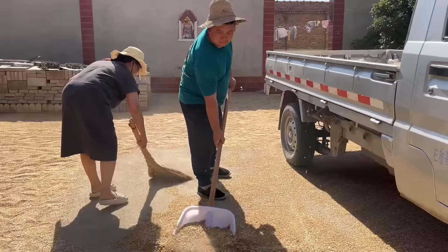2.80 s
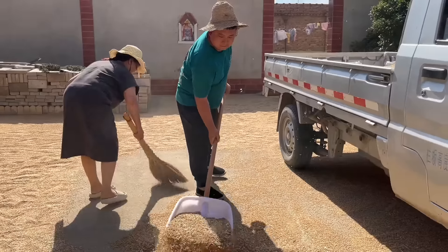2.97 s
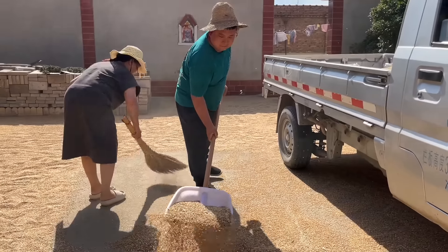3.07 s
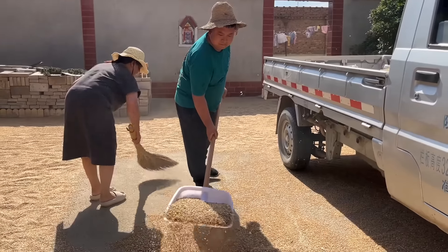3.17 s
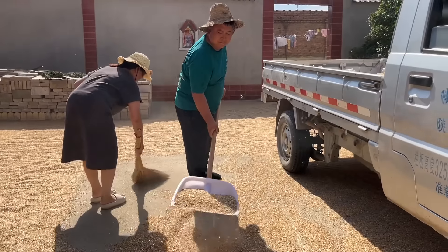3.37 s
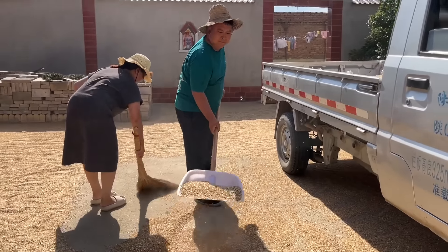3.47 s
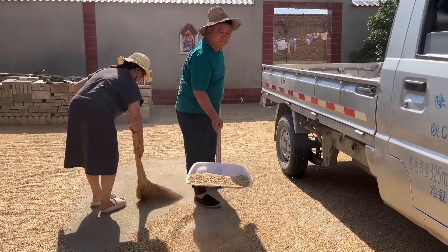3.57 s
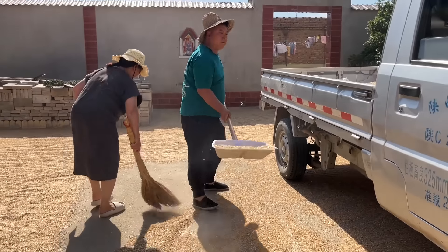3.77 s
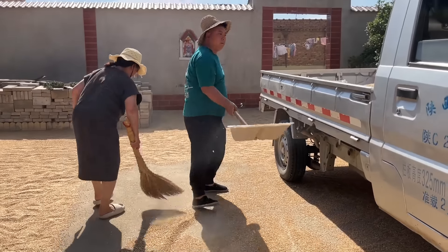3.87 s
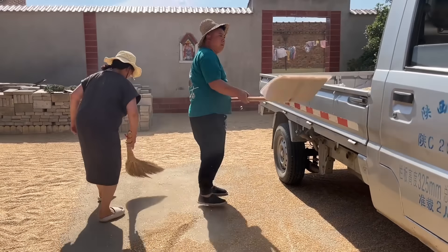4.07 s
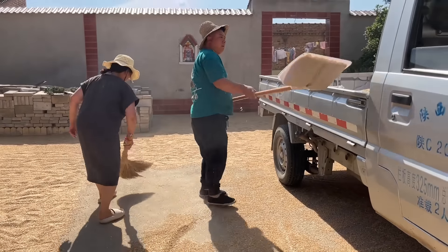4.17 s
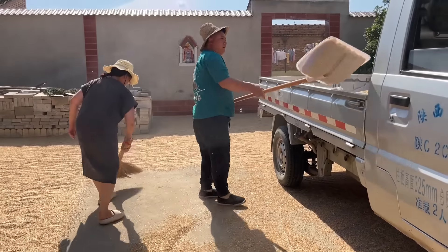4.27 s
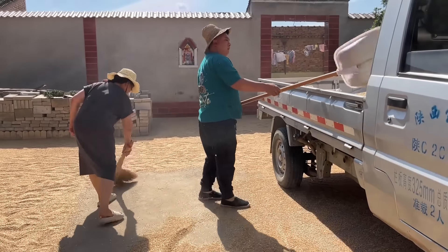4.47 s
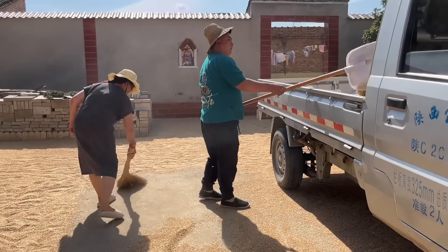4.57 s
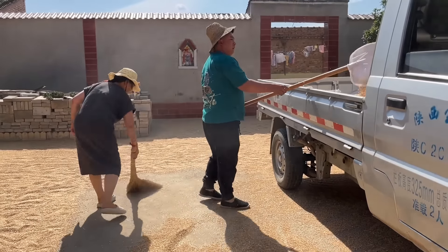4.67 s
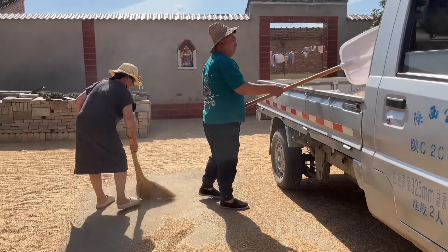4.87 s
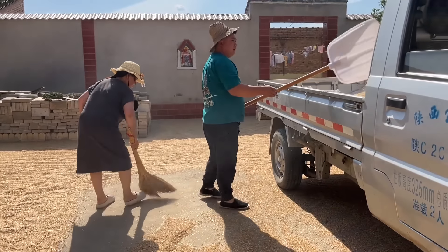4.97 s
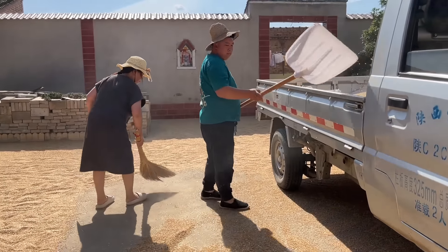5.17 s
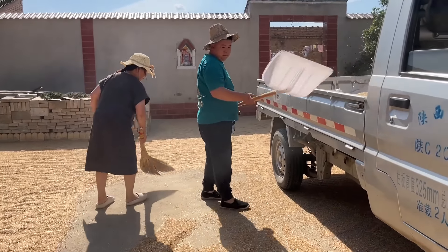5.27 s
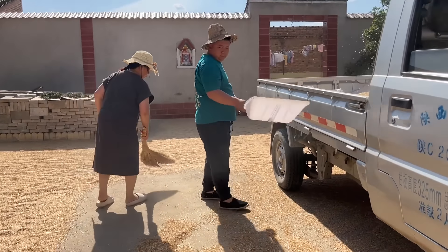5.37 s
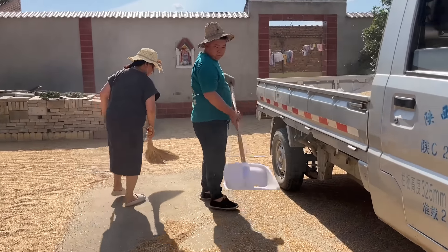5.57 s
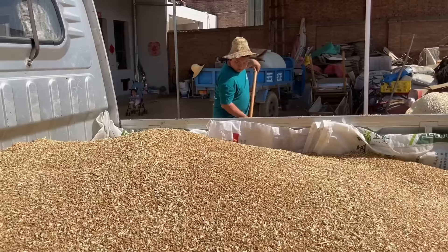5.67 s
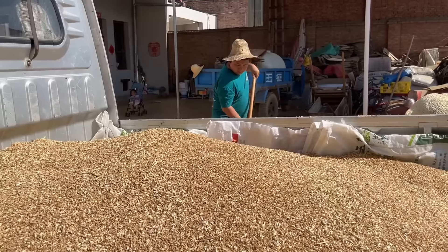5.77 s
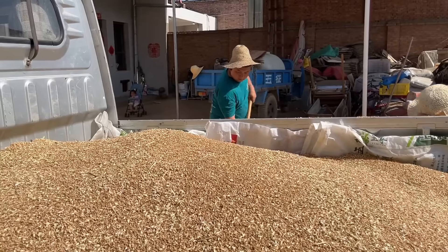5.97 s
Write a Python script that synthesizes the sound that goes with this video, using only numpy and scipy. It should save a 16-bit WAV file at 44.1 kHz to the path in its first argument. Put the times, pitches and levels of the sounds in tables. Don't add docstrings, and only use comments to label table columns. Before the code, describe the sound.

Close in a brick-walled yard, a gust buffets the microphone as a plastic shovel scrapes concrete and pushes into grain, in rough, ringing strokes. A straw broom hisses alongside and sparrows chirp. Just before three seconds the scraping stops; grain slides softly and kernels tick while the blade is lifted. Near the end the edge drops and scrapes again.

```python
import sys
import numpy as np
from scipy import signal
from scipy.io import wavfile
from scipy.ndimage import uniform_filter1d

SR = 44100
rng = np.random.default_rng(int(sys.argv[2]) if len(sys.argv) > 2 else 0)


def master(y):
    cut = np.clip(np.atleast_2d(y).T, -1, 1)
    pcm = np.round(cut * 32767)
    wavfile.write(sys.argv[1], SR, pcm.astype(np.int16))


def ratio_of_db(decibels):
    return 10 ** (np.asarray(decibels, float) / 20)


N = 265437

# pitch_hz, level_db (per Hz)
WIND_SPECTRUM = [(25, -33), (45, 0.5), (65, 1.5), (95, 3), (160, -39.5)]
# pitch_hz, level_db (per Hz)
RUMBLE_SPECTRUM = [(55, -32.5), (95, 7), (160, 9), (240, 3.5), (400, -35.5)]
# peak_s, rise_s, fall_s, wind_db, rumble_db (relative to wind)
GUSTS = [(.03, 0.18, 0.34, -37, -7.5), (.13, .1, 0.21, -37.5, -8.5), (.25, .12, 0.087, -35, -4),
         (.35, 0.15, 0.11, -29, -9), (.5, .12, 0.026, -39, -7), (.87, 0.2, 0.26, -62, 8),
         (1.46, 0.11, 0.26, -52.5, 11), (2.0, 0.6, 0.28, -62, -2), (2.34, 0.041, 0.2, -61.5, 18),
         (2.91, 0.34, 0.089, -62.5, -8.5), (3.34, 0.14, 0.044, -54.5, -21), (3.9, 0.46, .9, -85.5, 10.5),
         (4.9, .6, 0.65, -85.5, 9.5), (5.24, 0.39, 0.14, -72, -8), (5.6, 0.055, 0.091, -67.5, -1),
         (5.72, 0.15, 0.4, -53, 7.5)]
# start_s, peak_db, pitch_hz, length_s
BLOW = (.4765, -20, 92, .02)
# start_s, length_s, start_pitch_hz, end_pitch_hz, level_db
SPARROW_NOTES = [(1.124, 0.017, 4840, 4300, -41), (1.148, 0.019, 4310, 3780, -43.5),
                 (2.092, 0.02, 4800, 4490, -46), (2.113, 0.0203, 4154, 3850, -46.5),
                 (4.09, 0.025, 5520, 5160, -53.5), (4.117, 0.0184, 4160, 4360, -53.5),
                 (4.137, 0.011, 4430, 4080, -49), (4.151, 0.018, 3780, 3420, -52.5),
                 (5.311, 0.0059, 4255, 4260, -57.5), (5.316, 0.012, 5540, 5650, -54.5),
                 (5.326, .012, 5270, 5240, -54), (5.338, 0.0072, 4500, 4480, -50.5),
                 (5.354, 0.028, 4130, 4010, -48), (5.372, 0.026, 3700, 3350, -51.5),
                 (5.577, 0.013, 4530, 4780, -38), (5.59, 0.0343, 4010, 3680, -45)]
# start_s, length_s, start_pitch_hz, end_pitch_hz, level_db
WOOD_GROAN = (4.525, .065, 335, 405, -61)
# pitch_hz, level_db (per Hz)
HISS_SPECTRUM = [(1500, -9), (2500, 1), (3300, 0), (4200, 1), (5200, -0.5), (6200, -5), (7500, -10.5),
                 (9000, -29)]
# pitch_hz, level_db (per Hz)
FIZZ_SPECTRUM = [(5500, -30), (7000, -2.5), (9000, 7), (11000, 0), (13000, -2), (15000, -5.5),
                 (15700, -16.5)]
# peak_s, rise_s, fall_s, hiss_db, fizz_db (relative to hiss)
BROOM_STROKES = [(.27, 0.36, 0.21, -41, -9.5), (1.03, 0.11, 0.2, -48, -1.5), (1.22, 0.26, .2, -55.5, 6.5),
                 (2.05, 0.23, 0.15, -52.5, -7.5), (2.25, 0.24, 0.38, -60.5, 8), (2.9, 0.13, 0.54, -59.5, 6),
                 (3.33, 0.61, 0.54, -58, 4), (3.65, .3, 0.19, -63.5, 2), (3.9, 0.31, 0.55, -75.5, 2),
                 (4.27, 0.47, .3, -68.5, -10), (4.5, 0.19, 0.32, -59, -10.5),
                 (4.71, 0.32, 0.37, -58.5, 3.5), (5.08, 0.28, 0.4, -68, -2), (5.41, 0.19, .1, -65, -18.5)]
# peak_s, rise_s, fall_s, hiss_db, fizz_db (relative to hiss)
GRAIN_SURGES = [(0.0, .1, 0.064, -42.5, -16), (.07, 0.014, 0.0071, -38, -4), (.4, 0.28, 0.055, -41.5, -12),
                (.496, 0.034, 0.16, -44.5, -9), (.6, 0.13, .6, -45.5, -5.5), (.83, 0.33, 0.23, -37, -5.5),
                (1.385, 0.035, 0.076, -43, -6), (1.545, .04, 0.61, -42.5, -3),
                (1.73, 0.29, 0.43, -36, -6.5), (1.89, 0.32, 0.1, -34.5, -10.5),
                (2.34, 0.11, 0.049, -42.5, -14), (2.62, 0.47, 0.39, -50.5, -1.5),
                (2.77, 0.33, 0.016, -35.5, -9.5), (2.8, .003, 0.092, -48.5, 0),
                (3.18, 0.18, .06, -43.5, -7), (3.895, 0.026, 0.027, -55.5, -11),
                (3.968, 0.019, 0.027, -62, -13), (5.58, .004, 0.022, -58, -18),
                (5.77, 0.11, 0.72, -46, -11), (5.86, 0.41, 0.2, -45.5, -12), (6.019, 0.14, .1, -55, -9.5)]
# start_s, peak_db
STRAW_CRACKS = [(0.0673, -30.5), (.4935, -40.5), (.2199, -34), (1.51, -43.5), (2.2823, -41.5),
                (3.2485, -40.5), (3.8826, -58), (4.125, -47.5), (4.128, -48.5), (4.2747, -59.5),
                (4.4079, -46), (5.0696, -61), (5.3702, -41), (5.5133, -53), (5.5777, -44.5)]
# start_s, peak_db, ring_hz, snap_db (relative to ring), left_right_db
KERNEL_TICKS = [
    (2.986, -34, 1440, -13, -12),
    (3.295, -41.5, 1380, -11, -4),
    (4.126, -44, 1950, -16, 6),
    (4.882, -24.5, 1360, -11.5, 0),
    (5.148, -62, 1540, -12, 9),
    (5.266, -37.5, 1500, -18, -6),
    (5.314, -40, 1390, -13, -4),
]
# start_s, peak_db, ring_hz,
# snap_db (relative to ring), left_right_db
DULL_KNOCKS = [(0.067, -26.5, 1980, -2, 2), (0.478, -35, 2150, -2, 0), (4.206, -47, 1300, -5, 0),
               (4.406, -51, 1390, 5.5, 1.5), (5.135, -34.5, 1480, -14, -1), (5.176, -56, 1440, -6, -1),
               (5.371, -48, 2250, 1.5, 2), (5.428, -43.5, 1650, -15, 6), (5.474, -37.5, 935, -26, 4),
               (5.502, -33.5, 740, -15, 3), (5.513, -44, 1490, -2, 0.0), (5.578, -34, 1020, -12, -2)]
# peak_s, rise_s, fall_s, rattle_db, spill_db (relative to rattle)
GRAIN_SLIDES = [(2.801, 0.003, 0.12, -46, -1), (2.98, 0.1, 0.15, -50, -12), (3.085, 0.13, 0.11, -54, 2.5),
                (3.17, 0.13, 0.087, -49.5, 4), (3.33, 0.2, 0.33, -64, -1), (3.62, 0.37, 0.56, -68, -8),
                (4.1, .2, 0.26, -78, -2.5), (4.45, 0.44, 0.4, -71.5, 10.5), (4.8, 0.25, 0.35, -66.5, -6),
                (5.2, 0.41, 0.36, -62.5, 0), (5.37, 0.36, 0.082, -66, 1), (5.52, 0.082, 0.061, -74, 7)]
# time_s, pitch_hz
BLADE_HOLLOW = [(2.82, 1100), (2.9, 1300), (2.955, 1460), (3.04, 1450), (3.12, 1250), (3.15, 1000),
                (3.2, 760), (3.28, 1320), (4.1, 1460), (4.2, 960), (4.4, 1370), (5.4, 1480), (5.46, 1040),
                (5.58, 1200)]
# pitch_hz, level_db (per Hz)
MURMUR_SPECTRUM = [(150, -29.5), (250, -4.5), (370, 0), (520, -1.5), (800, -5), (1300, -24.5)]
# peak_s, rise_s, fall_s, level_db
FOOT_SCUFFS = [(2.803, .004, 0.061, -44), (2.87, 0.07, 0.2, -52), (3.13, .3, 0.26, -63.5),
               (3.3, 0.091, 0.67, -71), (3.65, 0.56, 0.75, -71.5), (4.22, 0.036, 0.044, -67),
               (4.5, 0.43, 0.23, -66), (4.76, 0.098, .4, -70.5), (5.18, .4, 0.34, -72)]
# from_s, until_s
BLADE_LIFTED = (2.79, 5.578)
# start_s, peak_db, blade_pitch_hz
EDGE_CATCHES = [(.544, -25.5, 427), (.564, -19, 423), (0.599, -12, 423), (0.624, -10, 426),
                (0.675, -14, 408), (0.719, -15.5, 417), (.782, -21, 415), (1.358, -32, 890),
                (1.376, -19.5, 364), (1.39, -12.5, 356), (1.425, -15.5, 410), (1.519, -24, 430),
                (1.616, -23, 441), (1.638, -21.5, 520), (1.669, -22, 756), (1.733, -14, 655),
                (1.757, -13, 616), (1.79, -17, 420), (1.886, -18.5, 697), (2.329, -28, 410),
                (2.444, -30.5, 900), (2.469, -29, 420), (2.539, -22.5, 423), (2.579, -18, 350),
                (2.651, -20.5, 360), (2.676, -24, 490), (2.699, -18.5, 640), (2.725, -16, 548),
                (2.758, -23.5, 384), (5.619, -20, 364), (5.664, -16, 368), (5.685, -16.5, 361),
                (5.71, -13.5, 348), (5.74, -15.5, 345), (5.767, -14, 377), (5.848, -13.5, 361),
                (5.9, -19.5, 361)]
# time_s, pressure_db, speed_db (brightness, relative to pressure)
SHOVEL_PUSHES = [
    [(0.0, -37, -10), (.046, -52, 6), (.158, -46, 1), (.324, -44, 5), (.402, -39.5, -5), (.462, -59.5, 5),
     (.496, -44.5, 2)],
    [(.519, -29.5, -5.5), (.575, -23, -7), (.7, -23, -5), (.835, -24.5, -2), (.915, -30, -12),
     (1.139, -56.5, -3.5), (1.354, -70, -8)],
    [(1.357, -45, -0.5), (1.374, -29.5, -1.5), (1.4, -26, -8), (1.496, -35, -11), (1.536, -32, -1.5),
     (1.77, -27.5, 1.5), (1.892, -25.5, -4), (2.014, -39.5, -8), (2.26, -64.5, 0)],
    [(2.265, -58, -3), (2.292, -37.5, -7.5), (2.332, -29, -4), (2.414, -36, -13.5), (2.47, -37, -3),
     (2.5, -33, -5.5), (2.7, -25.5, -7.5), (2.775, -25.5, -4.5)],
    [(5.578, -36.5, -15.5), (5.706, -25.5, -11.5), (5.79, -28.5, -3), (5.858, -27.5, -5), (5.9, -32, -3.5),
     (5.95, -31.5, -7), (6.019, -37.5, -3.5)],
]
# time_s, pitch_hz, overtone_db (relative), overtone_hz
BLADE_LOAD = [(0, 460, -4, 690), (.49, 420, -5.5, 685), (.55, 433, -7, 780), (.7, 400, -16.5, 694),
              (.8, 387.6, -1.5, 755), (.9, 388, -2, 744), (1.35, 378, 0.5, 680), (1.54, 380, -6, 690),
              (1.75, 417, 4, 640), (1.8, 370, -2, 696), (1.9, 395, 2, 720), (2.3, 402, -2, 714),
              (2.64, 382, 1.5, 600), (2.72, 475, -2, 596), (2.777, 427, -6.5, 560), (5.578, 352, -9, 600),
              (5.8, 360, -4, 596), (6.02, 330, 0.5, 643)]
# pitch_hz, level_db (per Hz)
CLATTER_SPECTRUM = [(500, -27), (850, -3), (1100, 3.5), (1500, 1), (2300, -1), (3000, -9.5), (3800, -16),
                    (5000, -46), (8000, -61)]
# (pitch_hz, width_hz, level_db)
BLADE_MODES = [(.519, 0.64, [(790, 34, 8.5), (1495, 25, -7.5), (2030, 68, 2.5), (2450, 38, -6),
               (2500, 15, -10)]), (.59, 0.764, [(1025, 92, -3.5), (1630, 99, 1), (1940, 140, 1),
               (2490, 45, 2.5), (2864, 50, -6.5)]), (.72, 1.359, [(764, 61, -3.5), (1045, 68, 6.5),
               (1446, 130, -5.5), (2600, 32, -4.5), (3387, 53, -17.5)]), (1.356, 1.53, [(1098, 39, 3),
               (1460, 92, -7), (1900, 67, -12), (2820, 25, -9.5)]), (1.49, 1.725, [(1070, 95, 1),
               (1470, 56, -4), (2360, 53, -3), (2590, 90, -5.5), (2990, 48, -4.5)]),
               (1.7, 2.281, [(1396, 43, -4.5), (2110, 160, -12), (2640, 57, -16), (2930, 160, -6.5),
               (3550, 100, -17)]), (2.275, 2.465, [(1010, 180, 0.5), (1540, 33, -7), (1920, 130, -14),
               (2420, 110, -13)]), (2.44, 2.79, [(1046, 24, 4), (2144, 22, -10.5), (2440, 220, -10)]),
               (5.583, 5.797, [(864, 24, -4), (1055, 48, -3), (1285, 25, 9.5), (2545, 140, -10)]),
               (5.77, 6.023, [(1143, 34, -5.5), (1305, 25, 7.5), (1803, 80, -13), (2468, 190, -8.5)])]
# pitch_hz, level_db
PORT_DIFFERENCE = [(60, -13.5), (200, -16.5), (380, -10.5), (700, -4.5), (1400, -1), (1800, -3.5),
                   (2200, -11.5), (3000, -4), (4400, -2.5), (7000, -2)]
# start_s, end_s, level_db
SCENE_DIPS = [
    (.4962, .5195, -65),
    (2.7765, 2.798, -36),
]
# time_s, level_db
SHORT_CLICK = (3.1, -33)


def evened(x):
    return x / np.sqrt(np.mean(np.square(x)) + 1e-20)


def read(points, hz):
    f, value = np.transpose(points)
    return np.interp(np.log(hz + 1), np.log(f + 1), value)


def controls(tables):
    s, *columns = np.transpose(np.vstack(tables))
    return [np.interp(np.arange(N) / SR, s, c) for c in columns]


def humps(rows, shape):
    peak, rise, fall, db, *more = np.transpose(rows)[..., None]
    t = np.arange(0, N + 32, 32) / SR
    away = np.where(t < peak, (peak - t) / rise, (t - peak) / fall)
    power = ratio_of_db(2 * db - 40 * away ** shape)
    gains = [np.sqrt((power * ratio_of_db(2 * relative_db)).sum(0)) for relative_db in [0] + more]
    return [np.interp(np.arange(N) / SR, t, gain) for gain in gains]


def coloured(x, points, size=4096):
    level_db = read(points, abs(np.fft.fftfreq(size, 1 / SR)))
    log_gain = np.log(ratio_of_db(np.maximum(level_db, -100)))
    taps = np.fft.ifft(np.exp(signal.hilbert(log_gain).conj())).real[:size // 2]
    return signal.oaconvolve(x, taps)[:N]


def resonate(x, hz, width):
    turn = np.exp(2j * np.pi * np.cumsum(hz * np.ones(x.shape[-1])) / SR)
    r = np.exp(-np.pi * width / SR)
    return 2 * (turn * signal.lfilter([1 - r], [1, -r], x / turn + 1e-18)).real


def clicks(per_s, spread_db, bed):
    size = ratio_of_db(spread_db * np.minimum(rng.exponential(1, N), 3.8))
    size = size * (rng.random(N) < per_s / SR)
    return evened(size * rng.choice([-1, 1], N)) + bed * rng.standard_normal(N)


def flutter(samples, db):
    smooth = uniform_filter1d(uniform_filter1d(rng.standard_normal(N), samples), samples)
    return ratio_of_db(db * evened(smooth))


def pair(x):
    return np.array([x, np.roll(x, N // 3)])


def add(mix, s, sound):
    part = mix[..., round(s * SR):][..., :sound.shape[-1]]
    part += sound[..., :part.shape[-1]]


def lifted():
    t = np.arange(N) / SR
    return (t > BLADE_LIFTED[0]) & (t < BLADE_LIFTED[1])


def echoes(x, t60, gap_s):
    t = np.arange(0, t60, 1 / SR)
    taps = rng.choice([-1, 1], len(t)) * (rng.random(len(t)) < .06)
    taps = taps * ratio_of_db(-60 * t / t60) * (t >= gap_s)
    return signal.oaconvolve(x, taps / np.linalg.norm(taps))[:N]


def wind():
    calm_wind_db, calm_rumble_db = -79, -80.5
    shake_db, ground_db, full_pressure_db = -76.5, -44, -25
    gust_gain, rumble_gain = humps(GUSTS, 0.98)
    edge = ~lifted() * ratio_of_db(controls(SHOVEL_PUSHES)[0] - full_pressure_db)
    gust_gain = gust_gain + ratio_of_db(shake_db) * edge + ratio_of_db(calm_wind_db)
    rumble_gain = rumble_gain + ratio_of_db(ground_db) * edge + ratio_of_db(calm_rumble_db)
    gust = pair(evened(coloured(rng.standard_normal(N), WIND_SPECTRUM)))
    rumble = pair(evened(coloured(rng.standard_normal(N), RUMBLE_SPECTRUM)))
    out = gust_gain * gust * flutter(900, 2.5) + rumble_gain * rumble
    start_s, peak_db, hz, length_s = BLOW
    t = np.arange(0, length_s, 1 / SR)
    swell = np.minimum(t / 0.013, 1 - 60 * np.maximum(t - .013, 0))
    add(out[0], start_s, ratio_of_db(peak_db) * swell * np.sin(2 * np.pi * hz * t))
    return out


def sparrows():
    out = np.zeros(N)
    rasp = evened(uniform_filter1d(rng.standard_normal(N), size=40))
    for (s, length, from_hz, to_hz, db), turn in zip(SPARROW_NOTES, rng.random(len(SPARROW_NOTES))):
        t = np.arange(0, length, 1 / SR)
        warble = 2 * np.pi * (240 * t + turn)
        wobble = 0.044 * np.sin(warble) + 0.018 * rasp[round(s * SR):][:len(t)]
        hz = np.linspace(from_hz, to_hz, len(t)) * (1 + wobble)
        note = np.sin(2 * np.pi * np.cumsum(hz) / SR) * (1 + 0.31 * np.cos(warble))
        add(out, s, ratio_of_db(db) * note * signal.windows.tukey(len(t), .3))
    return out * flutter(30, 1.6)


def creak():
    start_s, length_s, from_hz, to_hz, db = WOOD_GROAN
    out = np.zeros(N)
    u = np.arange(0, 1, 1 / (length_s * SR))
    hz = from_hz + (to_hz - from_hz) * np.sqrt(u)
    swell = u * np.sqrt(1 - u) * 3.0
    add(out, start_s, ratio_of_db(db) * swell * np.sin(2 * np.pi * np.cumsum(hz) / SR))
    return out


def broom():
    hiss_gain, fizz_gain = np.hypot(humps(GRAIN_SURGES, 1), humps(BROOM_STROKES, 1.43))
    snaps = clicks(5000, 1.6, 0.62) * flutter(400, 0.89)
    hiss = pair(evened(coloured(snaps, HISS_SPECTRUM)))
    fizz = pair(evened(coloured(snaps, FIZZ_SPECTRUM)))
    return hiss_gain * hiss + fizz_gain * ratio_of_db(4.5) * fizz


def cracks():
    t60_s = .012
    out, t = np.zeros(N), np.arange(800) / SR
    bursts = rng.standard_normal((len(STRAW_CRACKS), len(t)))
    for (s, db), burst in zip(STRAW_CRACKS, bursts):
        add(out, s, ratio_of_db(db - 60 * t / t60_s) * burst)
    return coloured(out, FIZZ_SPECTRUM)


def ticks():
    out, t = np.zeros((2, N)), np.arange(1500) / SR
    hits = KERNEL_TICKS + DULL_KNOCKS
    falls = [0.1] * len(KERNEL_TICKS) + [2.4] * len(DULL_KNOCKS)
    snaps = rng.standard_normal((len(hits), len(t))) * ratio_of_db(-60 * t / .011)
    snaps = signal.lfilter(*signal.butter(2, 6500, fs=SR), snaps)
    for (s, db, hz, snap_db, pan_db), fall, snap in zip(hits, falls, snaps):
        phase = 2 * np.pi * np.cumsum(hz * 2 ** (fall * (.4 - t / 0.0036))) / SR
        ring = ratio_of_db(-60 * t / 0.015) * np.sin(phase) * np.minimum(t / 0.00089, 1)
        hit = 1.07 * ring + ratio_of_db(snap_db) * snap
        add(out, s, ratio_of_db(db) * np.outer([1, np.tanh(pan_db / 17)], hit))
    return out


def swish():
    calm_rattle_db, calm_murmur_db, slide_shape = -86.5, -81, 1.25
    hollow_gain, spill_gain = humps(GRAIN_SLIDES, slide_shape)
    rattle, hz = clicks(1200, 1.8, 0.43), controls([BLADE_HOLLOW])[0]
    hollow = evened(resonate(resonate(pair(rattle), hz, 250), hz, 740))
    spill = pair(evened(coloured(rattle, CLATTER_SPECTRUM)))
    murmur = pair(evened(coloured(rng.standard_normal(N), MURMUR_SPECTRUM)))
    rattling = (hollow_gain + ratio_of_db(calm_rattle_db)) * hollow + (spill_gain + ratio_of_db(calm_rattle_db)) * spill
    murmur_gain = humps(FOOT_SCUFFS, slide_shape)[0] + ratio_of_db(calm_murmur_db)
    return lifted() * (ratio_of_db(-3.0) * rattling + murmur_gain * murmur)


def catches():
    out, t = np.zeros((2, N)), np.arange(0, .016, 1 / SR)
    swell = (t / 0.0082) * np.exp(1 - t / 0.0043)
    for s, db, hz in EDGE_CATCHES:
        add(out[0], s - .002, ratio_of_db(db) * np.sin(2 * np.pi * hz * t) * swell)
    return out


def shovel():
    tilt_s = 0.042
    pressure_db, speed_db = controls(SHOVEL_PUSHES)
    boom_db = pressure_db - 0.6
    clatter_db = pressure_db + speed_db - 0.53
    hz, damped_db, over_hz = controls([BLADE_LOAD])
    overtone_db = damped_db + .7 * speed_db
    slips = clicks(500, 3.1, 0.98)
    grit = clicks(4000, 2.1, 0.88) * flutter(250, 0.94)
    lowest = evened(resonate(resonate(pair(slips), hz, 130.4), hz, 540))
    overtone = pair(evened(resonate(resonate(slips[::-1], over_hz, 280), over_hz, 600)))
    boom = lowest + ratio_of_db(overtone_db) * overtone
    grit = np.array([grit, grit[::-1]])
    clatter = evened([coloured(g, CLATTER_SPECTRUM) for g in grit])
    for start, end, modes in BLADE_MODES:
        stroke = grit[:, round(start * SR):round(end * SR)]
        rings = 0
        for f, width, db in modes:
            ring = resonate(resonate(stroke, f, width + 30), f, 3 * width + 90)
            rings = rings + ratio_of_db(.5 * db) * evened(ring)
        fade = np.sqrt(signal.windows.tukey(rings.shape[1], 2 * tilt_s / (end - start)))
        add(clatter, start, 0.36 * rings * fade)
    return ~lifted() * (ratio_of_db(boom_db) * boom + ratio_of_db(clatter_db) * evened(clatter))


def scene():
    bird, (tick, tick_side) = sparrows(), ticks()
    mid, scattered = shovel() + catches() + swish() + broom() + wind()
    smeared = 1.25 * bird * (flutter(20, 4.1) - .6)
    point = smeared + ratio_of_db(-21.0) * tick
    far_wall = np.roll(echoes(smeared, 0.15, 0), round(0.053 * SR))
    point = point + ratio_of_db(-7) * far_wall
    tail, side_tail = (ratio_of_db(-4.0) * echoes(point, 0.31, 0.012) for _ in "ms")
    near = mid + .8 * echoes(mid, 0.00297, .0002)
    spread = 0.96 * scattered + 0.3 * near + side_tail + echoes(tick, 0.0055, 0)
    side = coloured(spread, PORT_DIFFERENCE) + .5 * bird + tick_side
    mid = mid + bird + tick + tail + creak() + cracks()
    return np.array([mid + side, mid - side])


def low_pass(x):
    return signal.sosfilt(signal.butter(12, 15700, fs=SR, output="sos"), x)


def record(dry):
    split_hz, in_step_hz, turn_hz, weak_share = 6700, 12000, 7250, .33
    sum_and_difference = [(dry[0] + dry[1]) / 2, (dry[0] - dry[1]) / 2]
    hz, _, (mid, side) = signal.stft(sum_and_difference, SR, nperseg=1024)
    hz = hz[:, None]
    low = 1 / (1 + (hz / split_hz) ** 24)
    half_turn = np.pi * (hz - in_step_hz) / turn_hz
    shares = -np.array([np.cos(half_turn), np.sin(half_turn)])
    frames = mid.shape[1]
    ragged = rng.standard_normal((2, 1, frames // 2 + 1)).repeat(2, axis=2)[..., :frames]
    weak = weak_share * ratio_of_db(2.6 * ragged)
    kept = shares * (abs(shares) > weak) * (1 - low)
    z = np.array([mid * (low + kept[0]), side * low + .85j * mid * kept[1]])
    around = uniform_filter1d(abs(z), size=24, axis=1)
    z *= (abs(z) > .55 * around * np.clip(hz / 6000, 0, 1))
    mid, side = signal.istft(z, SR, nperseg=1024)[1][:, :N]
    t = np.arange(N) / SR
    click_s, click_db = SHORT_CLICK
    mid = mid + ratio_of_db(click_db) * (np.arange(N) == round(click_s * SR))
    dips = np.prod([np.where((t > a) & (t < b), ratio_of_db(db), 1) for a, b, db in SCENE_DIPS], axis=0)
    return low_pass(np.array([mid + side, mid - side]) * dips)


dry = scene()
out = record(dry)
master(out)
```